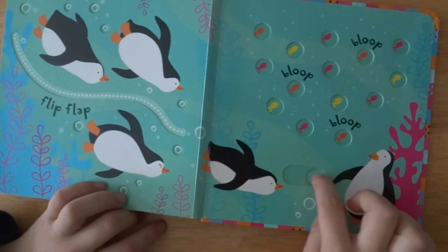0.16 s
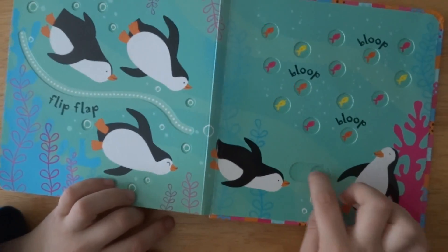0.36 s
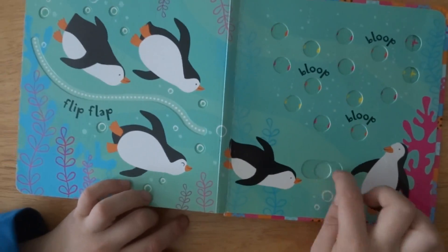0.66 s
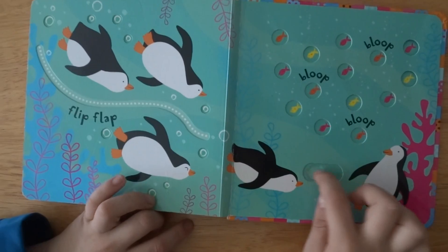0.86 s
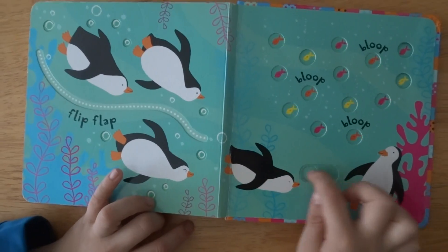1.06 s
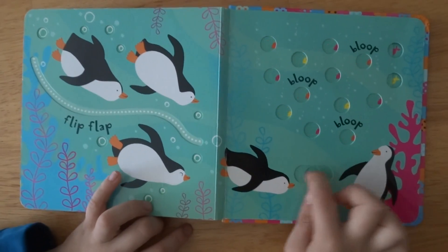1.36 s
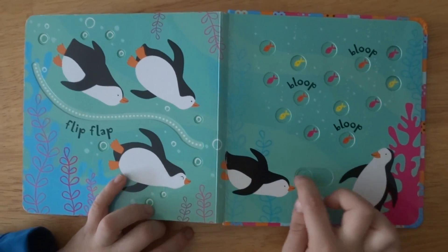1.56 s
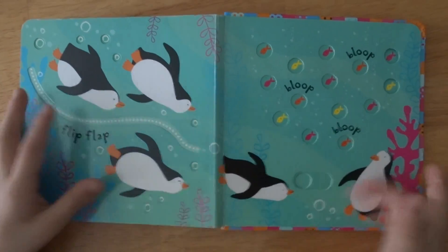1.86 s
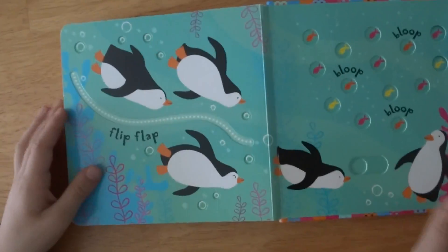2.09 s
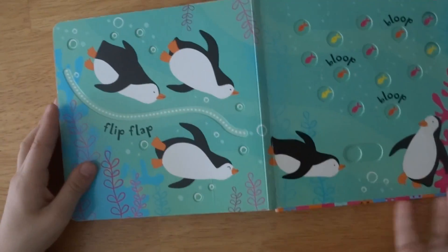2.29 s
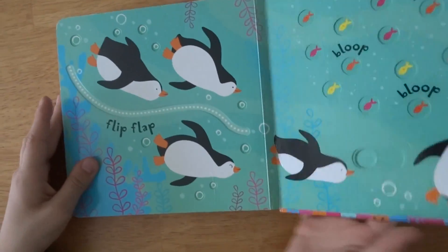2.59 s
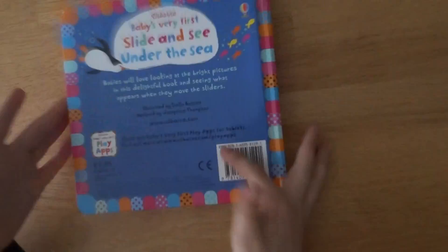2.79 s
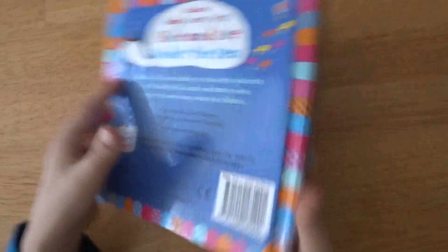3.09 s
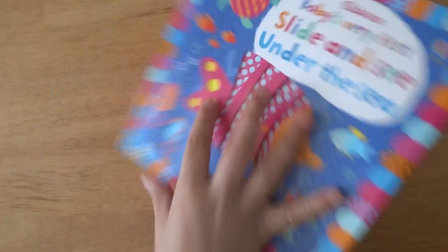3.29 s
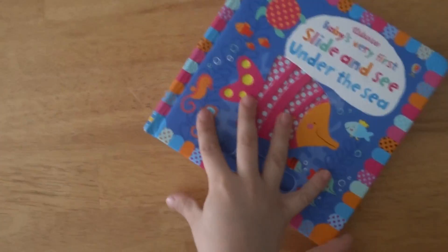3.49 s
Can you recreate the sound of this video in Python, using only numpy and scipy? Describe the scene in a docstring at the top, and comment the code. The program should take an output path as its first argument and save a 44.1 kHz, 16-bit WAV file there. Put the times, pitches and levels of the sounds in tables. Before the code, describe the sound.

Cardboard slider in a board book clicks back and forth, then the book thuds shut on wood

```python
"""A card slider in a board book clicks against its stops, worked back and forth by a fingernail: short modal rings.
The book is shut, flipped, dropped and slid on a wooden table: modes of board and table top with slaps of squeezed air.
Hands rub the pages: friction noise of hiss and small slips, which also carries the slide of the shut book.
A small room answers with sparse random reflections, a near wall first, over room tone and microphone hiss.
"""
import sys
import numpy as np
from scipy import signal
from scipy.fft import rfft, irfft, next_fast_len
from scipy.io import wavfile
from scipy.ndimage import uniform_filter1d, minimum_filter1d

SR = 44100
rng = np.random.default_rng(int(sys.argv[2]) if len(sys.argv) > 2 else 0)


def wav_out(sig):
    """Save sig, one row per channel (or a flat mono array), as 16-bit PCM at SR to the path in sys.argv[1]."""
    wavfile.write(sys.argv[1], SR, np.round(np.clip(np.atleast_2d(sig).T, -1, 1) * 32767).astype(np.int16))


def voltage_ratio(level):
    """Linear amplitude factor for a level in decibels (scalar or array-like)."""
    return 10 ** (np.asarray(level, float) / 20)


N = 160965  # samples


def evened(x):
    """Energy normalisation: scales to rms 1."""
    return x / np.sqrt(np.mean(x ** 2) + 1e-20)


def read(points, hz):
    """Logarithmic frequency scale: interpolates a table along it."""
    table_hz, value = np.transpose(points)
    return np.interp(np.log(hz + 1), np.log(table_hz + 1), value)


def add(mix, start_s, sound):
    """Linear superposition: adds a sound to the mix from its start time."""
    part = mix[round(start_s * SR):][:len(sound)]
    part += sound[:len(part)]


def coloured(x, points):
    """Linear filtering: multiplies the spectrum by a response given in dB."""
    size = next_fast_len(x.shape[-1])
    response = voltage_ratio(read(points, np.fft.rfftfreq(size, 1 / SR)))
    return irfft(rfft(x, size) * response, size)[..., :x.shape[-1]]


def ring(modes, chance, spread, rise_s=.0001):
    """Modal superposition: one blow starts decaying sines, neighbours in opposite phase, peak 1."""
    t = np.arange(round(SR * max(t60 for _, _, t60 in modes))) / SR
    x = np.zeros(len(t))
    for k, ((hz, db, t60), c) in enumerate(zip(modes, chance)):
        decay = voltage_ratio(db + 2 * c - 60 * t / t60)
        x += (-1) ** k * decay * np.sin(2 * np.pi * hz * (1 + spread * c) * t)
    x = x * (1 - np.exp(-t / rise_s))
    return x / abs(x).max()


# Treble response to sharp sounds. Each row: frequency in Hz, gain in dB.
SHARP_RESPONSE = [(9000, -0.5), (10500, 4.5), (12000, -10), (15000, -28)]


def sharp_treble(x):
    """Frequency response: treble of sharp sounds, which peaks near 10.5 kHz and falls away steeply above it."""
    return coloured(x, SHARP_RESPONSE)


# Spectrum of room tone and hiss. Each row: frequency in Hz, relative level in dB per Hz.
AIR_SPECTRUM = [(20, -40), (38, -23), (55, 1.5), (75, -12.5), (115, 4.5), (150, -6), (215, -0.5),
                (310, -10.5), (370, -12.5), (480, -6.5), (650, -17.5), (1000, -22), (1500, -26),
                (2400, -29), (4500, -32.5), (7300, -29.5), (9200, -32), (12000, -64), (16000, -73)]


def air():
    """Stationary coloured noise: room tone and microphone hiss, gently lumpy in level."""
    level_db, lump_db, side_db = -60, 0.71, -15.5  # side_db against the mid
    mid, side = coloured(rng.standard_normal((2, N)), AIR_SPECTRUM)
    side = voltage_ratio(side_db) * side
    lumps = evened(uniform_filter1d(rng.standard_normal(N), 3000))
    return voltage_ratio(level_db + lump_db * lumps) * evened(np.array([mid + side, mid - side]))


# Decay of the small room. Each row: frequency in Hz, reverberation time t60 in seconds.
ROOM_DECAY = [(100, 0.36), (260, 0.94), (700, 0.5), (1840, 0.42), (4850, 0.44), (10000, 0.4)]


def room(x):
    """Statistical reverberation: sparse taps of random sign, each band dying at its own speed."""
    start_s, rise_s, side_db = 0.00067, 0.016, -21
    wall_s, wall_wide_s, wall_db = 0.016, 0.023, 6.5  # a near wall answers with a bunch
    turns_hz = 7  # three sets of random reflections take turns, so the tail keeps changing
    length, gap = SR // 2, 12  # samples
    # three tap sets for the mid, three for the side
    taps = np.zeros((6, length))
    at = np.arange(0, length - gap, gap) + rng.integers(0, gap, (6, (length - 1) // gap))
    np.put_along_axis(taps, at, rng.choice([-1., 1.], at.shape), 1)
    hz, t, z = signal.stft(taps, SR, nperseg=256)
    decay = voltage_ratio(-60 * t / read(ROOM_DECAY, hz)[:, None])
    tail = signal.istft(z * decay, SR, nperseg=256)[1]
    t = np.arange(tail.shape[1]) / SR
    wall = voltage_ratio(wall_db * np.exp(-((t - wall_s) / wall_wide_s) ** 2))
    tail = tail * np.clip((t - start_s) / rise_s, 0, 1) * wall
    phase = np.arange(N) / SR * turns_hz + np.arange(6)[:, None] / 3
    turn = np.sqrt(2 / 3) * np.cos(2 * np.pi * phase)
    paths = signal.fftconvolve(x * turn, tail / np.linalg.norm(tail[0]), axes=1)[:, :N]
    mid, side = paths[:3].sum(0), voltage_ratio(side_db) * paths[3:].sum(0)
    return np.array([mid + side, mid - side])


def grit(points):
    """Stick-slip friction: steady hiss and small random slips in equal strength, coloured, rms 1."""
    slips_per_s, slip_db = 1500, 3.5
    size = voltage_ratio(slip_db * np.minimum(rng.exponential(1, N), 3.))
    slips = size * (rng.random(N) < slips_per_s / SR) * rng.choice([-1., 1.], N)
    hiss = rng.standard_normal(N)
    return evened(coloured(evened(slips) + hiss, points))


# Rubbing strokes. Each row: start in seconds, length in seconds, level in dB before rise, fade and judder,
# weight from 0 (fingertip on gloss) to 1 (board on wood).
RUB_STROKES = [(0.137, 0.06, -53.5, 0.44), (0.394, 0.04, -58, 0.1), (0.433, 0.052, -55, 0.32),
               (0.608, 0.082, -60.5, 0.4), (0.757, 0.063, -42, 0.79), (0.898, 0.043, -53, 0.66),
               (0.997, 0.072, -47.5, 0.78), (1.112, 0.062, -51, 0.55), (1.203, 0.07, -43.5, 0.67),
               (1.296, 0.089, -52, 0.64), (1.423, 0.041, -41, 1), (1.628, 0.074, -59, 0.65),
               (1.77, 0.22, -60, 0.27), (1.859, 0.08, -47.5, .4), (1.919, 0.21, -49.5, 0.32),
               (2.094, 0.48, -57, 0.12), (2.559, 0.35, -56.5, 0), (2.694, 0.11, -53, 0.16),
               (2.832, 0.1, -29.5, 0.75), (3.024, 0.19, -46, 0.5), (3.124, 0.056, -42, 0.5),
               (3.165, 0.089, -36.5, 0.24), (3.288, 0.22, -46, 0.73)]
# The shut book slides round. Each row: time in seconds, level in dB before judder.
BOOK_SLIDE = [(3.354, -67), (3.356, -30), (3.389, -18.5), (3.405, -32), (3.409, -12.5), (3.444, -17),
              (3.464, -34), (3.471, -45), (3.484, -48), (3.486, -18.5), (3.508, -21.5), (3.535, -29),
              (3.55, -35), (3.561, -61)]
# Friction of skin on gloss. Each row: frequency in Hz, relative level in dB per Hz.
SKIN_SPECTRUM = [(200, -45), (620, -3), (1000, -11), (1800, -24), (2800, -3.5), (4000, -8.5), (5600, -3),
                 (6800, -4), (8100, -0.5), (9400, -8), (12000, -23), (16000, -33)]
# Friction of board on wood, also heard in the slaps. Each row: frequency in Hz, relative level in dB per Hz.
WOOD_SPECTRUM = [(25, -46), (60, -24), (118, -19), (244, -3.5), (294, -21.5), (417, -8.5), (636, -1.5),
                 (1010, -9), (1510, -4.5), (2580, -7), (2770, -11), (8120, -16.5), (16000, -56)]


def rubbing():
    """Sliding friction: strokes shared by equal power between skin and wood; the grip catches unevenly."""
    rise_share, fade_db = 0.25, -4.5  # rise as a share of the stroke, fade over all of it
    judder_db, judder_s = 2., .005
    light, heavy = np.zeros(N), np.zeros(N)
    for start_s, length_s, db, weight in RUB_STROKES:
        u = np.arange(round(length_s * SR)) / (length_s * SR)
        shape = voltage_ratio(db + fade_db * u) * np.minimum(u / rise_share, 1) * np.minimum(3 * (1 - u), 1)
        add(light, start_s, shape * np.cos(weight * np.pi / 2))
        add(heavy, start_s, shape * np.sin(weight * np.pi / 2))
    slide_s, slide_db = np.transpose(BOOK_SLIDE)
    heavy = heavy + voltage_ratio(np.interp(np.arange(N) / SR, slide_s, slide_db, -120, -120))
    wander = uniform_filter1d(rng.standard_normal(N), int(judder_s * SR))
    judder = voltage_ratio(judder_db * evened(uniform_filter1d(wander, 80)))
    return judder * (light * grit(SKIN_SPECTRUM) + heavy * grit(WOOD_SPECTRUM))


# Book against the table. Each row: start in seconds, board peak in dB, table thump in dB against the board,
# slap in dB against the board.
BOOK_KNOCKS = [(1.774, -57.5, 16.5, 9.5), (1.845, -48.5, 11.5, -2), (1.898, -40, -4, 12.5),
               (2.1505, -39.5, 2.5, -10), (2.157, -21.5, -18, -4), (2.718, -46, 0, 12.5),
               (2.839, -22.5, -5, 14), (2.857, -15.5, -10, 4.5), (3.094, -24.5, -8, 4.5),
               (3.123, -22.5, -1, -4), (3.148, -34, -4, 17.5), (3.355, -29, 4.5, 21),
               (3.406, -17.5, 1.5, -4), (3.444, -20, -21, 20), (3.489, -15, -9, -7)]
# Modes of the book board. Each row: nominal frequency in Hz, nominal level in dB, t60 in seconds.
BOARD_MODES = [(290, -7, .035), (410, -8, .035), (520, -4, .035), (630, 0, .045), (710, -2, .035),
               (820, -3, .035), (960, -6, .03), (1450, -11, .02)]
# Modes of the table top. Each row: nominal frequency in Hz, nominal level in dB, t60 in seconds.
TABLE_MODES = [(58, -21.5, 0.13), (112.2, -11.5, 0.26), (168.7, -4.5, 0.087), (255, 4.5, 0.016),
               (308, -9, 0.038)]


def knocks():
    """Impact excitation: each blow rings the board and the table top and slaps out squeezed air."""
    slap_fall_s, board_rise_s, table_rise_s = 0.0024, 0.00048, 0.0034  # exponential time constants
    out, t = np.zeros(N), np.arange(2048) / SR
    noise = rng.standard_normal((len(BOOK_KNOCKS), 2048))
    slaps = coloured(noise, WOOD_SPECTRUM) * np.exp(-t / slap_fall_s)
    chances = rng.uniform(-0.77, 1, (len(BOOK_KNOCKS), 13))
    for (start_s, db, thump_db, slap_db), c, slap in zip(BOOK_KNOCKS, chances, slaps):
        add(out, start_s, voltage_ratio(db) * ring(BOARD_MODES, c, 0.11, board_rise_s))
        add(out, start_s, voltage_ratio(db + thump_db) * ring(TABLE_MODES, c[8:], 0.085, table_rise_s))
        add(out, start_s + .001, voltage_ratio(db + slap_db) * slap / abs(slap).max())
    return sharp_treble(out)


# Slider and nail clicks. Each row: start in seconds, card ring peak in dB, bright tick in dB against the ring,
# loudest ring frequency in Hz, share sent round the room in dB.
SLIDER_CLICKS = [(.023, -53, -25, 1200, -4), (.409, -42, 6, 1100, -4), (.442, -50, 14, 4000, -6),
                 (.453, -50, 12, 4500, -6), (.46, -50, 14, 4000, -6), (.495, -39, -28, 1400, -5),
                 (.621, -38, -22, 1200, -4), (.75, -26, -4, 1540, -5), (.771, -29.5, 2, 815, -3),
                 (.793, -18, -20, 1690, -5), (.911, -29.5, -29, 1400, -6), (1.01, -30.5, 5, 900, -4),
                 (1.034, -19, -20, 1800, -5), (1.119, -34, -3, 1000, -3), (1.124, -28, -27, 1100, -5),
                 (1.214, -26, 1, 900, -5), (1.244, -14.5, -16, 1800, -5), (1.308, -22, -6, 980, -7),
                 (1.342, -26, -13, 1700, -7), (1.428, -28, 2, 1300, -3), (1.45, -17.5, -20, 1790, -5),
                 (1.625, -45, -30, 1090, -4), (1.65, -35, -14, 1100, -7), (1.861, -40, 2, 1930, -4),
                 (1.887, -30, 6, 1940, -8), (1.899, -33, 3, 900, -8), (2.2555, -40, 6, 1900, -5),
                 (2.585, -44, 0, 1460, -8), (2.616, -40, 0, 1000, -8), (2.672, -44, 0, 2000, -4),
                 (2.719, -28, 2, 2890, -6), (2.737, -40, -10, 2000, -8), (3.036, -32, -19, 1500, -6),
                 (3.073, -32, -15, 2500, -6), (3.138, -18, -14, 2300, -10), (3.145, -23, -20, 1900, -10),
                 (3.1535, -18, -16, 2400, -10), (3.167, -22, 14, 2000, -7), (3.2215, -22, -6, 1500, -6),
                 (3.247, -28, -14, 2500, -8), (3.2903, -20, -2, 2600, -10), (3.3645, -15, 2, 3000, -10),
                 (3.3705, -13, 1, 2500, -10), (3.4743, 3, -8, 2600, -26), (3.563, -7, -5, 3300, -13),
                 (3.601, -13.5, -4, 3300, -11)]
# Modes of the card. Each row: nominal frequency in Hz, level in dB before the tilt of each click, t60 in seconds.
CARD_MODES = [(760, 3, .011), (920, 4, .011), (1250, 0, .007), (1520, 1, .008), (1850, 0, .010),
              (2450, -2, .009), (3200, -4, .007), (3700, -1, .007), (4250, -2, .006), (4950, -4, .005)]
# Modes of the bright tick. Each row: nominal frequency in Hz, nominal level in dB, t60 in seconds.
TICK_MODES = [(5900, -6, .003), (6700, -1, .004), (7400, 0, .004), (8200, -4, .003), (9400, -12, .002)]


def clicks():
    """Modal impact: the slider and nail ring the card with a bright tick; returns dry sound and room feed."""
    below_db, above_db = -13, -5  # card modes fade per octave squared, below and above the loudest
    spread, rattle_s, rattle = .04, .0015, .025  # relative pitch scatter, chatter decay and strength
    out, t = np.zeros((2, N)), np.arange(300) / SR
    rough = rng.standard_normal((len(SLIDER_CLICKS), 300)) ** 3
    chatter = rattle * rough * np.exp(-t / rattle_s) + (t == 0)  # the first hit, then brief small ones
    chances = rng.uniform(-0.63, 1, (len(SLIDER_CLICKS), len(CARD_MODES) + len(TICK_MODES)))
    for (start_s, db, tick_db, top_hz, wet_db), c, hits in zip(SLIDER_CLICKS, chances, chatter):
        card = []
        for hz, mode_db, t60 in CARD_MODES:
            slope_db = below_db if hz < top_hz else above_db
            card.append((hz, mode_db + slope_db * np.log2(hz / top_hz) ** 2, t60))
        parts = (db, card, c), (db + tick_db, TICK_MODES, c[len(CARD_MODES):])
        for level_db, modes, chance in parts:
            x = np.convolve(ring(modes, chance, spread), hits)
            x = x / abs(x).max()
            add(out[0], start_s, voltage_ratio(level_db) * x)
            add(out[1], start_s, voltage_ratio(level_db + wet_db) * x)
    return sharp_treble(out)


def scene():
    """Superposition of direct and reverberant sound: all handling, dry and through the room, over the air."""
    knock_room_db, rub_room_db = -0.5, -2.5
    (click, click_feed), knock, rub = clicks(), knocks(), rubbing()
    feed = click_feed + voltage_ratio(knock_room_db) * knock + voltage_ratio(rub_room_db) * rub
    return click + knock + rub + room(feed) + air()


# Two close microphone ports. Each row: frequency in Hz, phase in radians by which the left leads the right.
PORT_PHASE = [(60, 0.22), (250, -0.36), (600, -.68), (2000, -0.64), (4500, -0.24), (10000, -0.18)]


def ports(x):
    """Phase difference between receivers: the two ports hear each band slightly out of step."""
    size = next_fast_len(N)
    phase = read(PORT_PHASE, np.fft.rfftfreq(size, 1 / SR)) * np.array([[.5], [-.5]])
    return irfft(rfft(x, size) * np.exp(1j * phase), size)[:, :N]


def limiter(x):
    """Look-ahead gain reduction: the level ducks smoothly around the loudest peaks."""
    limit_db, span = -5, int(.006 * SR)  # threshold; 6 ms in samples
    gain_db = np.minimum(limit_db - 20 * np.log10(abs(x).max(0) + 1e-9), 0)
    return x * voltage_ratio(uniform_filter1d(minimum_filter1d(gain_db, 2 * span), span))


def roll_off(x):
    """The treble ends steeply here."""
    return signal.sosfilt(signal.butter(12, 16500, fs=SR, output="sos"), x)


def record(dry):
    """Signal chain in series: microphone ports, limiter, then a low-pass at 16.2 kHz."""
    x = limiter(ports(dry))
    low_pass = signal.firwin(511, 16200, window=("kaiser", 9), fs=SR)
    mix = signal.oaconvolve(x, low_pass[None], "same")
    return roll_off(mix)


dry = scene()
out = record(dry)
wav_out(out)
```